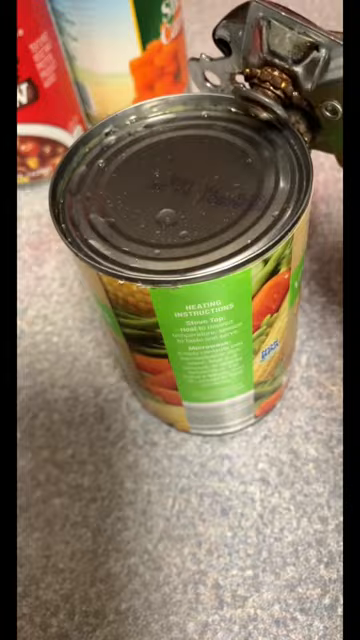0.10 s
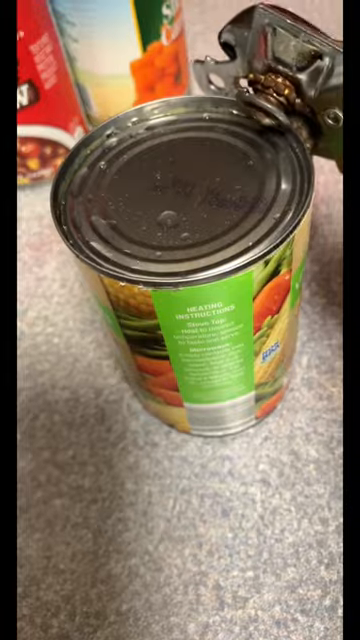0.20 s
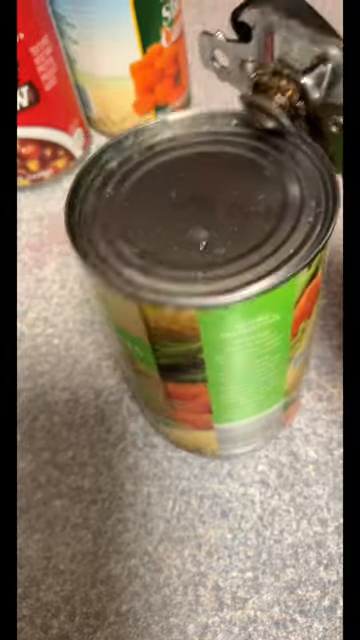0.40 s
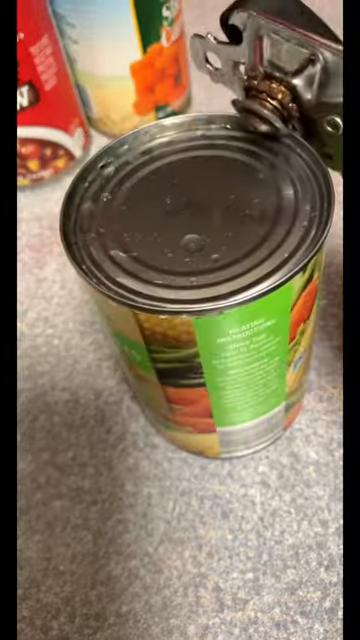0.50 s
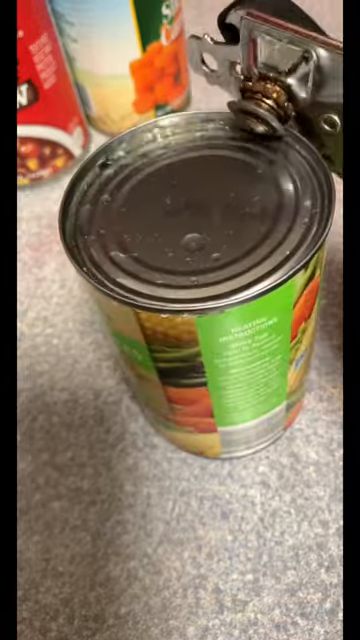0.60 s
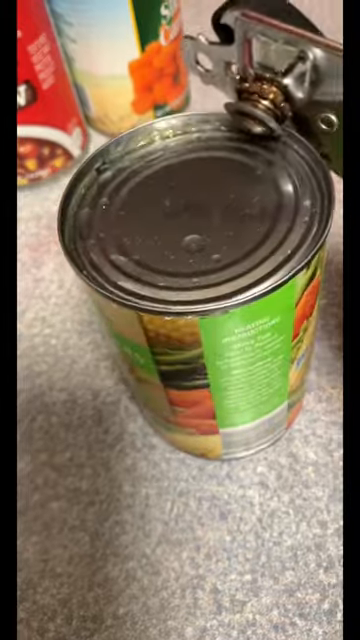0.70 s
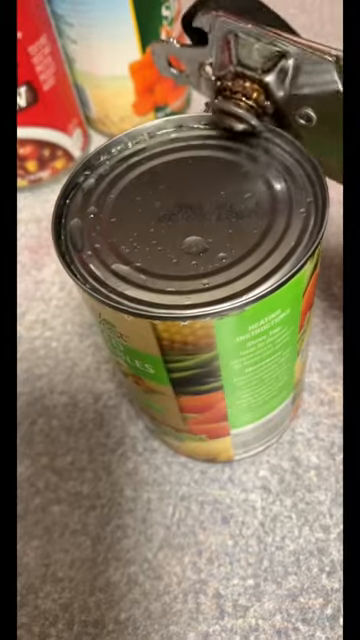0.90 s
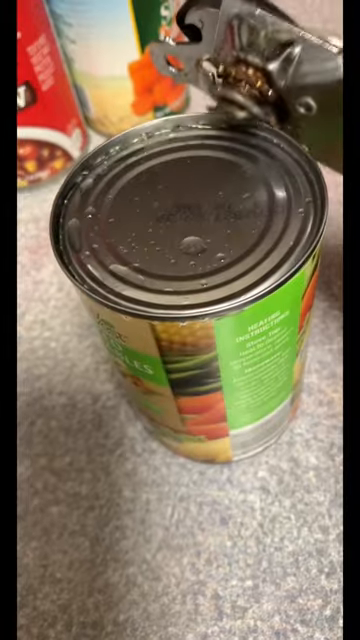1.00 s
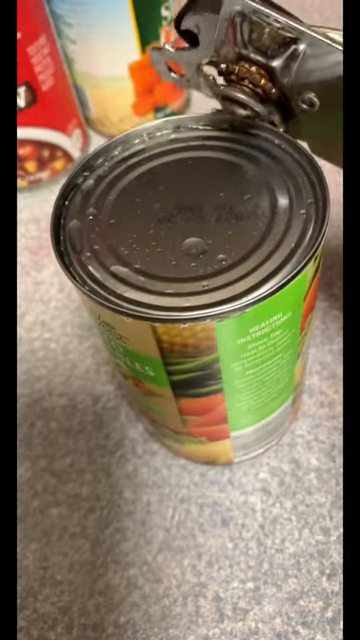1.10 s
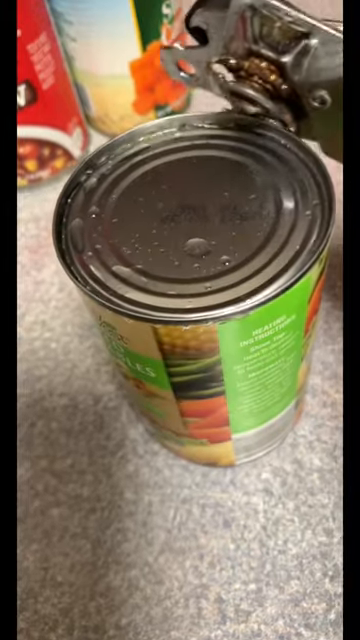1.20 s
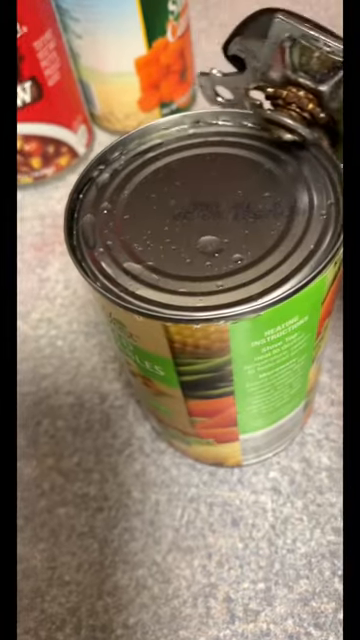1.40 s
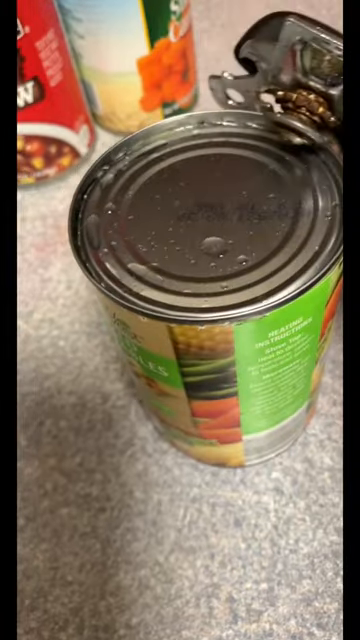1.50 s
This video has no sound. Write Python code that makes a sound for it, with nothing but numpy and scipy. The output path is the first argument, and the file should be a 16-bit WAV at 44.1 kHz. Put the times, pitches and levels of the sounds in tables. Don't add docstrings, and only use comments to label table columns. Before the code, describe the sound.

A can opener snaps sharply through a metal lid, with knocks and scraping over a low hum.

```python
import sys
import numpy as np
from scipy import signal
from scipy.fft import rfft, irfft, next_fast_len
from scipy.io import wavfile
from scipy.ndimage import uniform_filter1d, map_coordinates

SR = 44100
rng = np.random.default_rng(int(sys.argv[2]) if len(sys.argv) > 2 else 0)


def unload_wav(signal):
    wavfile.write(
        sys.argv[1],
        SR,
        np.round(np.clip(np.atleast_2d(signal).T, -1, 1) * 32767).astype(np.int16),
    )


def convert_level_to_amplitude(level_db):
    exponent = np.asarray(level_db, float) / 20
    return 10 ** exponent


N = 66150

# multiple of the hum, level in dB.
SHAFT_ORDERS = [(1 / 3, -19.5), (2 / 3, -18.5)]
# time in seconds, level in dB.
WHINE_LEVEL = [
    (0, -58),
    (.04, -58),
    (.06, -80),
    (.72, -80),
    (.75, -55.5),
    (.92, -55.5),
    (.935, -80),
]
# frequency in Hz, level in dB per Hz.
AIR_COLOUR = [(100, -10.5), (170, -1), (330, -11), (840, -28), (1950, -26.5), (2400, -33), (6500, -34.5),
              (8000, -41.5), (9800, -56)]
HUM_HZ, HUM_DB, HUM_SWAY_DB, HUM_DRIFT_HZ = 144.3, -36.5, 1.8, 2.2
WHINE_HZ, AIR_DB, AIR_SWAY_DB = 4500, -37.5, 1.2

# time in seconds, rub level in dB.
RUB_PRESSURE = [(0.0, -49), (.14, -48), (0.27, -45), (0.434, -43), (.62, -59), (0.738, -53), (.86, -50),
                (0.99, -56.5), (1.1, -49.5), (1.306, -47), (1.39, -47.5), (1.5, -44)]
# frequency in Hz, level in dB per Hz.
RUB_COLOUR = [(240, -4.5), (400, -17), (587, -6.5), (863, 5.5), (934, 0.5), (1760, -5.5), (2330, -28.5),
              (7000, -15), (9500, -51), (12400, -60.5), (20900, -120)]
# start in seconds, length in seconds, level in dB, centre in Hz, width in Hz.
SCRAPES = [
    (0.16, 0.085, -42, 3800, 1300),
    (0.162, 0.094, -42.5, 6400, 2800),
    (0.167, 0.1, -38.5, 1160, 503),
    (0.226, .07, -40, 1470, 500),
    (0.348, 0.079, -41.5, 1750, 507),
    (0.685, 0.036, -44, 5800, 4000),
    (1.116, 0.068, -48.5, 3500, 4050),
]
# time in seconds, throb level in dB.
GRIP_PRESSURE = [(0.0, -44), (0.054, -58.5), (0.212, -38.5), (0.238, -31), (0.496, -50), (0.542, -35),
                 (0.696, -52), (0.764, -41), (0.822, -60), (0.872, -43), (1.026, -68), (1.052, -45),
                 (1.206, -45), (1.236, -32), (1.26, -54), (1.348, -40), (1.366, -39), (1.5, -54)]
# frequency in Hz, level in dB per Hz.
GRIP_COLOUR = [(20, -18), (40, 15.5), (65, 31.5), (100, 21.5), (125, -30.5)]
GRIP_HZ, GRIP_DRIFT_HZ, RUMBLE_DB = 63.7, 6, -60.5

# start in seconds, then bright tick, hollow thud, lid ring and rattle, each in dB.
KNOCKS = [(0.0428, -36.5, -16, -31.5, -26), (0.109, -61, -27, -45, -55), (0.168, -55, -33, -46, -58),
          (0.2107, -16, -22, -37, -29.5), (0.355, -41, -25, -57, -47), (0.72, -45.5, -28, -48, -42),
          (0.755, -48, -42, -45.5, -53), (.934, -24, -23, -33.5, -43), (1.051, -53, -55, -54, -47.5),
          (1.143, -48, -44, -50.5, -50), (1.1871, -38.5, -32.5, -39, -45), (1.218, -15, -8.5, -15, -17.5)]
# frequency in Hz, level in dB per Hz.
TICK_COLOUR = [(900, -26.5), (2000, -9), (3000, -7), (3600, 2), (4500, -4.5), (6300, -5.5), (9800, -24)]
# frequency in Hz, level in dB per Hz.
RATTLE_COLOUR = [(260, -38.5), (450, -4), (1360, -6), (1600, -6), (2810, -21), (3140, -24), (9000, -30),
                 (11700, -66), (19800, -120)]
# frequency in Hz, level in dB, 60 dB decay in seconds.
LID_MODES = [(1163, -7, .22), (1626, -5, .2), (1781, -10, .18), (2202, -13, .12), (2455, -18, .2),
             (2649, -12, .14), (3058, -19, .2), (3456, -19, .16), (3725, -20, .17), (4167, -21, .13),
             (4452, -19, .12), (4759, -21, .16), (6212, -23, .13), (6675, -26, .15)]
# frequency in Hz, level in dB, 60 dB decay in seconds.
WHEEL_MODES = [(777, -9, 0.066), (1073, 4.5, 0.025), (1940, 5, 0.019), (2350, -6.5, 0.01), (3363, 1, .03),
               (4290, -6, 0.022), (5780, -6, 0.066), (6264, -4.5, 0.049)]
# frequency in Hz, level in dB, 60 dB decay in seconds.
BODY_MODES = [(99, -11, 0.17), (224.3, -5, 0.094), (317.8, -11, 0.3), (361, 9.5, 0.037),
              (523.4, -12.5, 0.093), (1277, -1, 0.027)]
TICK_RISE_S, TICK_T60 = 0.0002, 0.022
LONG_RATTLE_DB, LONG_RATTLE_T60, CHATTER_T60 = -4, 0.24, 0.12
THUD_RISE_S, RING_RISE_S, THUD_LAG_S = 0.0031, 0.006, 0.002136
HARD_DB, DULLING, RATTLE_DULLING = -13.5, 0.54, 0.82

# frequency in Hz, 60 dB decay in seconds.
ROOM_DECAY = [(200, 0.25), (1200, 0.37), (4000, 0.22), (9000, 0.36)]
ROOM_DB, WALL_DELAY_S = -11.5, 0.0088

# seconds after the first, level in dB.
GEAR_SKIPS = [
    (0, 0),
    (.003, -5.5),
    (.0065, -1),
    (.0095, -10.5),
]
# frequency in Hz, level in dB, 60 dB decay in seconds.
GEAR_MODES = [(519, -2.5, 0.068), (1167, 5, 0.033), (1440, -5, 0.024), (2080, 1, 0.016), (3306, -4, 0.018),
              (3940, -10, 0.013), (5640, -10.5, 0.022)]
GEAR_S, GEAR_DB = 0.2105, -19

# frequency in Hz, level in dB per Hz.
CRACK_COLOUR = [(400, -23), (900, -8), (2100, 5), (2800, -2), (3500, -3.5), (4150, 3), (5100, -7.5),
                (8100, -4.5), (9900, -19.5)]
# time in seconds, level in dB.
TEAR_FORCE = [
    (0.455, -6.5),
    (0.461, -21),
    (0.472, -10),
    (.49, -12.5),
    (0.523, -16.5),
    (.6, -30),
    (0.669, -41),
    (0.76, -54.5),
    (.84, -68.5),
]
# frequency in Hz, level in dB per Hz.
TEAR_COLOUR = [(180, -14.5), (300, -7.5), (650, -13), (1100, -8.5), (1900, -10.5), (2500, -15.5),
               (3700, -18), (4500, -15.5), (5900, -10.5), (7030, -9), (9840, -41), (12800, -65)]
# frequency in Hz, width in Hz, level in dB.
SHIVER_MODES = [(526, 11, -11), (927.6, 29, 0), (1096, 14, 1), (1182, 30, -0.5), (1375, 46, -8),
                (1479, 6.7, 2), (1780, 34, -5), (1924, 25, 3), (2970, 88, -15), (5000, 25, -12),
                (5745, 90, -3), (6070, 100, -2.5), (6700, 17, -14.5), (7120, 60, -8.5)]
# start in seconds, level in dB, brightness in dB per octave.
RIPS = [(.4665, -23, 0), (.4705, -6, -2.5), (.4735, -16.5, -1.5), (.4785, -11.5, -0.5), (.4805, -0.5, -1),
        (.485, -9, -2), (.4935, -13, -4.5), (.4968, -10.5, -4.5), (.5005, -21.5, -8), (.5065, -27, 7),
        (.5145, -6, -1)]
# start in seconds, level in dB.
JOLTS = [
    (.452, -17),
    (.462, -17),
    (.474, -14.5),
    (0.488, -22),
    (.586, -31.5),
    (0.658, -54),
]
# frequency in Hz, level in dB, 60 dB decay in seconds.
JOLT_MODES = [(101.4, -0.5, 0.11), (208, 1.5, 0.087), (260.4, -0.5, 0.09), (376, -1.5, 0.04),
              (537, -7.5, 0.14), (1096, 1, 0.17)]
SNAP_S, CRACK_DB, CRACK_T60 = 0.4488, 0, 0.023
SECOND_CRACK_LAG_S, SECOND_CRACK_DB = 0.005, -8
SQUEAK_HZ, SQUEAK_DB, SQUEAK_GROW_S = 6480, -25, 0.004
SLIPS_PER_S, SLIP_SPREAD_DB, SLIP_DB = 1200, 2, -8
TEAR_SURGE_DB, RIP_T60 = 1.1, 0.0095
SHIVER_DB, SHIVER_FADE_DB_PER_S = -1, -32

# frequency in Hz, level in dB.
OVERLOAD_BAND = [(9500, -60), (10300, 0), (15800, 0), (16200, -18), (20000, -22)]
# frequency in Hz, level in dB.
UPPER_EDGE = [(9300, -0.5), (9900, -3.5), (10250, -49), (10600, -90)]
OVERLOAD_S, OVERLOAD_DB = 0.451, -22
DUCK_DB, DUCK_S = -16, 0.11
LIMIT, OVERSHOOT, REACT_S = 0.86, 0.35, 0.005


def unit(x):
    return x / np.sqrt(np.mean(x ** 2) + 1e-20)


def along(points, hz):
    f, value = np.transpose(points)
    return np.interp(np.log(hz + 1), np.log(f + 1), value)


def curve(rows):
    return np.interp(np.arange(N) / SR, *np.transpose(rows))


def wobble(rate):
    return map_coordinates(rng.standard_normal(N // 40), [np.arange(N) * rate / SR])


def filtered(x, response):
    size = next_fast_len(len(x) + SR // 4)
    return irfft(rfft(x, size) * response(np.fft.rfftfreq(size, 1 / SR)), size)[:len(x)]


def noise(points, size=N):
    return unit(filtered(rng.standard_normal(size), lambda hz: convert_level_to_amplitude(along(points, hz))))


def ring(modes, rise_s, scatter_db, tilt_db=0):
    t = np.arange(SR // 3) / SR
    out = np.zeros(len(t))
    for hz, db, t60 in modes:
        level = db + tilt_db * np.log2(hz / modes[1][0]) + scatter_db * rng.standard_normal()
        phase = 0.15 * rng.standard_normal()
        out += convert_level_to_amplitude(level - 60 * t / t60) * np.sin(2 * np.pi * (hz * t + phase))
    return (1 - np.exp(-t / rise_s)) * out


def burst(points, t60, rise_s=0.00063):
    t = np.arange(SR // 3) / SR
    return noise(points, size=len(t)) * convert_level_to_amplitude(-60 * t / t60) * (1 - np.exp(-t / rise_s))


def add(track, s, x):
    part = track[round(s * SR):][:len(x)]
    part += x[:len(part)]


def appliance():
    t = np.arange(N) / SR
    turn = 2 * np.pi * np.cumsum(HUM_HZ + HUM_DRIFT_HZ * wobble(14)) / SR
    out = convert_level_to_amplitude(HUM_DB + 3 + HUM_SWAY_DB * wobble(14.3)) * np.sin(turn)
    for order, db in SHAFT_ORDERS:
        out += convert_level_to_amplitude(HUM_DB + 3 + db + 2.5 * wobble(14.3)) * np.sin(order * turn)
    out += convert_level_to_amplitude(curve(WHINE_LEVEL) + 1.2 * wobble(20)) * np.sin(2 * np.pi * WHINE_HZ * t)
    return out + convert_level_to_amplitude(AIR_DB + AIR_SWAY_DB * wobble(12.11)) * noise(AIR_COLOUR)


def handling():
    out = convert_level_to_amplitude(curve(RUB_PRESSURE) + 3.7 * wobble(59.55)) * noise(RUB_COLOUR)
    for s, length, db, hz, width in SCRAPES:
        stroke = signal.windows.tukey(round(length * SR), 0.9)
        band = filtered(rng.standard_normal(SR // 8), lambda f: 1 / (1 + (2 * (f - hz) / width) ** 2))
        level = convert_level_to_amplitude(db + 1.8 * wobble(100)[:len(stroke)])
        add(out, s, level * unit(band)[:len(stroke)] * stroke)
    throb = np.sqrt(2) * np.sin(2 * np.pi * np.cumsum(GRIP_HZ + GRIP_DRIFT_HZ * wobble(9.88)) / SR)
    return out + convert_level_to_amplitude(curve(GRIP_PRESSURE)) * throb + convert_level_to_amplitude(RUMBLE_DB) * noise(GRIP_COLOUR)


def knocks():
    out = np.zeros(N)
    for s, tick_db, thud_db, ring_db, rattle_db in KNOCKS:
        rattle = burst(RATTLE_COLOUR, CHATTER_T60, rise_s=0.0024)
        rattle += convert_level_to_amplitude(LONG_RATTLE_DB) * burst(RATTLE_COLOUR, LONG_RATTLE_T60, rise_s=0.004)
        rattle_tilt = RATTLE_DULLING * min(rattle_db - HARD_DB, 0)
        rattle = filtered(rattle, lambda hz: convert_level_to_amplitude(rattle_tilt * np.log2(1 + hz / 1500)))
        ring_tilt = DULLING * min(ring_db - HARD_DB, 0)
        metal = ring(LID_MODES, RING_RISE_S, 1.2, ring_tilt)
        metal += ring(WHEEL_MODES, 0.0006, 1.2, ring_tilt)
        tick = burst(TICK_COLOUR, TICK_T60, TICK_RISE_S)
        add(out, s, convert_level_to_amplitude(tick_db) * tick + convert_level_to_amplitude(rattle_db) * rattle + convert_level_to_amplitude(ring_db) * metal)
        add(out, s + THUD_LAG_S, convert_level_to_amplitude(thud_db) * ring(BODY_MODES, THUD_RISE_S, scatter_db=1))
    return out


def kitchen(x):
    hz, t, z = signal.stft(rng.standard_normal(SR // 2), SR, nperseg=256)
    decay = convert_level_to_amplitude(-60 * t / along(ROOM_DECAY, hz)[:, None])
    tail = signal.istft(z * decay, SR, nperseg=256)[1]
    delayed = np.pad(x, (round(WALL_DELAY_S * SR), 0))
    return signal.fftconvolve(delayed, tail / np.linalg.norm(tail))[:N]


def gear():
    out = np.zeros(N)
    for after, db in GEAR_SKIPS:
        add(out, GEAR_S + after, convert_level_to_amplitude(GEAR_DB + db) * ring(GEAR_MODES, 0.00016, scatter_db=3.5))
    return out


def squeak():
    t = np.arange(N) / SR
    swell = np.exp(np.minimum(t - SNAP_S, 0) / SQUEAK_GROW_S) * (t < SNAP_S)
    return convert_level_to_amplitude(SQUEAK_DB) * swell * np.sin(2 * np.pi * SQUEAK_HZ * t)


def crack():
    out = np.zeros(N)
    add(out, SNAP_S, convert_level_to_amplitude(CRACK_DB) * burst(CRACK_COLOUR, CRACK_T60))
    add(out, SNAP_S + SECOND_CRACK_LAG_S, convert_level_to_amplitude(CRACK_DB + SECOND_CRACK_DB) * burst(TEAR_COLOUR, CRACK_T60))
    return out


def lid_response(f):
    total = 0
    for k, (centre, width, db) in enumerate(SHIVER_MODES):
        loss = 1j * f * width
        total = total + (-1) ** k * convert_level_to_amplitude(db) * loss / (centre * centre - f * f + loss)
    return total


def tear():
    t = np.arange(N) / SR
    chance = rng.random(N)
    size = rng.exponential(size=N) * rng.choice([-1, 1], N)
    slip_level = convert_level_to_amplitude(np.minimum(SLIP_SPREAD_DB * abs(size), 14))
    slips = (chance < SLIPS_PER_S / SR) * np.sign(size) * slip_level
    drive = rng.standard_normal(N) + convert_level_to_amplitude(SLIP_DB) * unit(slips)
    force = convert_level_to_amplitude(curve(TEAR_FORCE) + TEAR_SURGE_DB * wobble(130.1))
    force *= np.clip((t - TEAR_FORCE[0][0]) / 0.0018, 0, 1)
    force *= np.clip((TEAR_FORCE[-1][0] - t) / 0.018, 0, 1)
    tearing = unit(filtered(drive, lambda f: convert_level_to_amplitude(along(TEAR_COLOUR, f))))
    shiver_level = convert_level_to_amplitude(SHIVER_DB + SHIVER_FADE_DB_PER_S * np.maximum(t - 0.52, 0))
    out = force * (tearing + shiver_level * unit(filtered(drive, lid_response)))
    for s, db, bright_db in RIPS:
        colour = [(hz, level + bright_db * np.log2(hz / 2500)) for hz, level in TEAR_COLOUR]
        add(out, s, convert_level_to_amplitude(db) * burst(colour, RIP_T60))
    return out


def jolts():
    out = np.zeros(N)
    for s, db in JOLTS:
        add(out, s, convert_level_to_amplitude(db) * ring(JOLT_MODES, THUD_RISE_S, scatter_db=1.2))
    return out


def scene():
    background = appliance() + handling()
    hits = knocks() + gear()
    snap = squeak() + crack() + tear() + jolts()
    return (background + hits + convert_level_to_amplitude(ROOM_DB) * kitchen(hits) + snap)[None]


def top_cut(x):
    return signal.sosfilt(signal.butter(12, 20000, fs=SR, output="sos"), x)


def record(dry):
    level = np.sqrt(abs(uniform_filter1d(dry[0] ** 2, round(DUCK_S * SR))))
    x = dry[0] / np.sqrt(1 + (level / convert_level_to_amplitude(DUCK_DB + 8)) ** 2)
    top = LIMIT + OVERSHOOT * (np.arange(N) / SR < SNAP_S + REACT_S)
    x = x / (1 + abs(x / top) ** 8) ** (1 / 8)
    x = np.pad(x, 512, "reflect")
    x = filtered(x, lambda hz: convert_level_to_amplitude(along(UPPER_EDGE, hz)))[512:-512]
    click = -convert_level_to_amplitude(OVERLOAD_DB) * (np.arange(N) == round(OVERLOAD_S * SR))
    x += filtered(click, lambda hz: convert_level_to_amplitude(along(OVERLOAD_BAND, hz)))
    return top_cut(x[None])


dry = scene()
out = record(dry)
unload_wav(out)
```